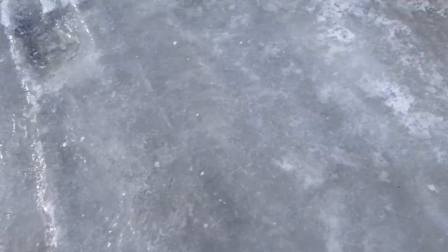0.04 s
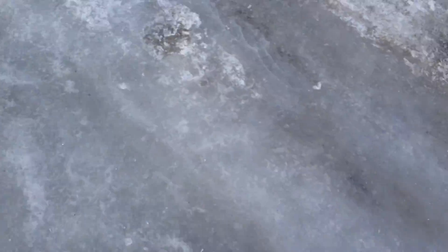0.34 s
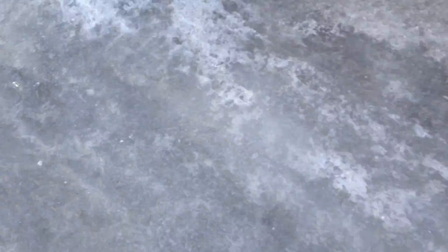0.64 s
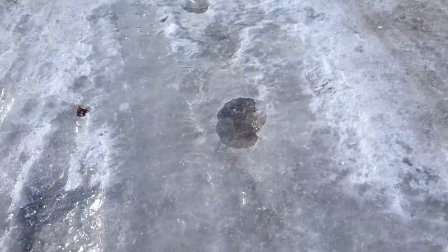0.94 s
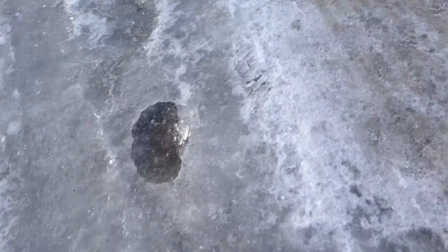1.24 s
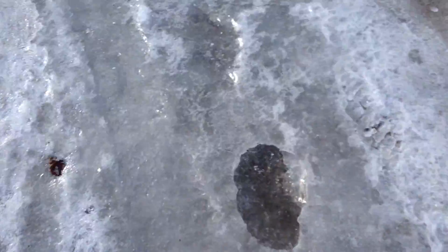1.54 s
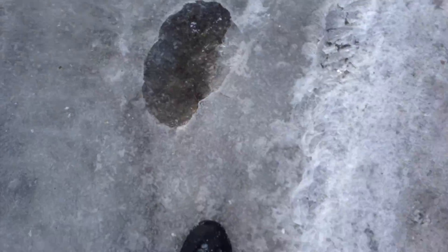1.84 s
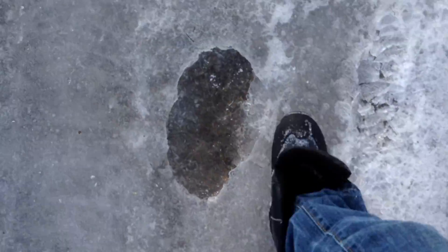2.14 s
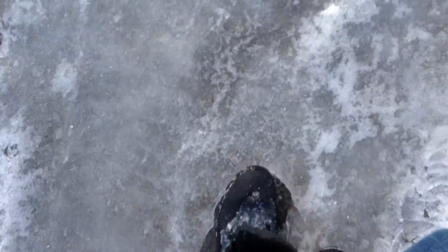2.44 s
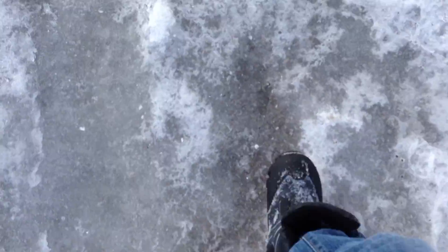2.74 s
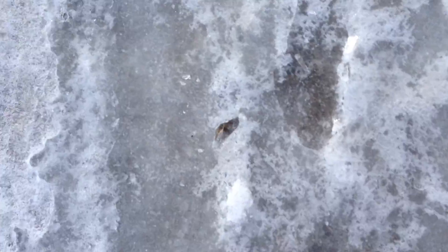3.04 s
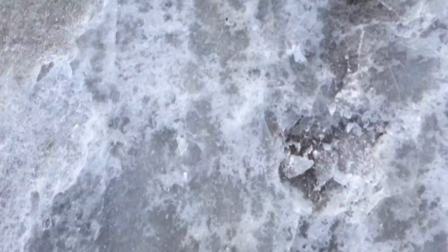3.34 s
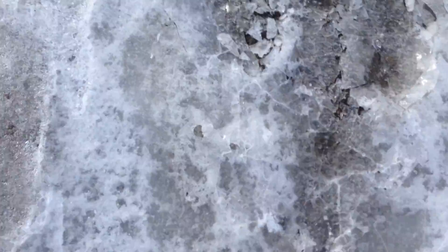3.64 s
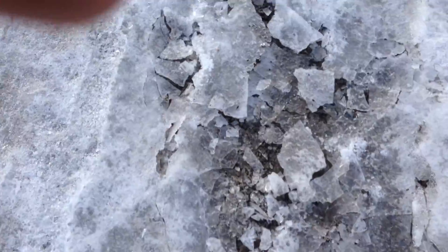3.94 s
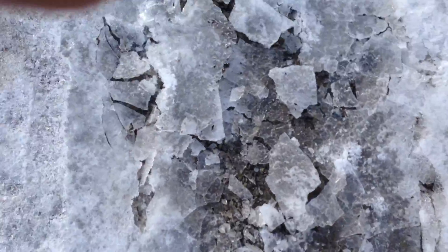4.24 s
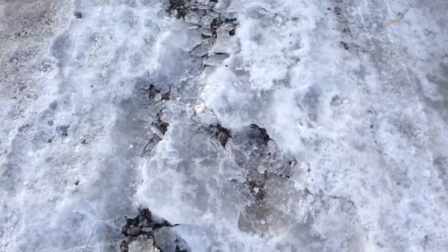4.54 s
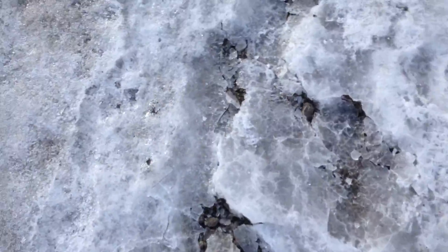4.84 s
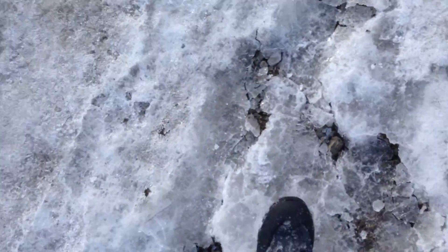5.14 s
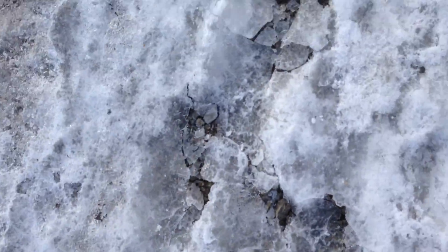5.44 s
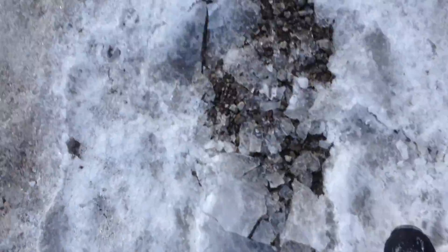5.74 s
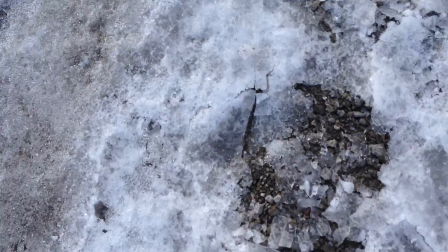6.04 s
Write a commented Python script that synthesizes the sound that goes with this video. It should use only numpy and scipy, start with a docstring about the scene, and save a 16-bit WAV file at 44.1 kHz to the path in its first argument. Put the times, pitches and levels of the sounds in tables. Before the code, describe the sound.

Soft footsteps on solid ice turn into sharp cracks and crunches as thin ice breaks, over light wind rumble and faint distant traffic.

```python
"""Boots walk on frozen ground close to the microphone: soft steps on solid ice, then thin ice gives way.
Plates snap, rock and knock over the hollow below; splinters crunch and grit rustles under the sole.
Two small metal zip pulls jingle with the stride.
Gusts buffet the microphone; far traffic murmurs in the open air."""
import sys
import numpy as np
from scipy import signal
from scipy.fft import rfft, irfft, next_fast_len
from scipy.io import wavfile
from scipy.ndimage import map_coordinates

SR = 44100
rng = np.random.default_rng(int(sys.argv[2]) if len(sys.argv) > 2 else 0)


def log_audio(samples):
    """Write samples as a 16-bit WAV file to the path given in sys.argv[1]."""
    # one column per channel
    frames = np.atleast_2d(samples).T
    # limit to full scale, then quantise
    limited = np.clip(frames, -1, 1)
    pcm = np.round(limited * 32767).astype(np.int16)
    wavfile.write(sys.argv[1], SR, pcm)


N = 277830

# ice plates snap: (time [s], level [dB], pitch [Hz], splinter treble [dB])
SNAPS = [(.174, -46.5, 2850, -45), (0.643, -41.5, 1500, -47.5), (1.176, -43, 1980, -43.5),
         (1.289, -35, 2930, -43), (1.388, -35.5, 1780, -64), (1.564, -53, 1460, -42),
         (1.592, -38.5, 3240, -40), (2.426, -58, 2300, -44.5), (2.59, -42, 2640, -54),
         (2.676, -39.5, 2960, -44), (2.799, -38, 3100, -47), (2.953, -34.5, 1510, -37),
         (2.964, -39, 1840, -44), (2.971, -47, 2010, -38), (3.055, -32, 1930, -49),
         (3.061, -32.5, 1940, -57), (3.219, -26, 2030, -34), (3.284, -24.5, 2600, -55),
         (3.313, -21.5, 1630, -52), (3.318, -24.5, 2000, -48), (3.403, -26.5, 1690, -64),
         (3.657, -40, 1530, -45), (3.669, -35.5, 3400, -38), (3.739, -32.5, 2430, -50),
         (3.757, -24.5, 1290, -35), (3.788, -23.5, 3630, -35), (3.897, -41, 5100, -32),
         (3.958, -51, 3800, -48), (3.979, -58, 4550, -41.5), (4.023, -53, 3580, -47),
         (4.066, -48, 1980, -46), (4.078, -34, 3000, -45), (4.132, -36.5, 2620, -40),
         (4.217, -32, 2700, -35), (4.279, -36.5, 3170, -42), (4.306, -30.5, 2060, -63),
         (4.407, -34, 3300, -37.5), (4.479, -36, 2830, -60), (4.581, -32.5, 2580, -43),
         (4.597, -23.5, 1510, -33), (4.643, -21.5, 3330, -26), (4.647, -15.5, 3020, -32),
         (4.694, -23.5, 2390, -41), (4.718, -21.5, 2470, -66), (4.738, -19.5, 2900, -33.5),
         (4.769, -23, 3430, -28.5), (4.802, -26, 3120, -33), (4.822, -28, 2740, -42),
         (4.918, -23.5, 2390, -31), (4.949, -15.5, 3060, -24), (4.997, -23.5, 2010, -27.5),
         (5.029, -62, 3500, -56), (5.048, -33, 1830, -45), (5.073, -30, 2940, -42), (5.086, -27, 3480, -39),
         (5.113, -36, 3100, -49), (5.13, -20, 2700, -30.5), (5.161, -27, 3050, -31),
         (5.168, -18.5, 2760, -35), (5.21, -21.5, 2170, -32), (5.27, -26.5, 1402, -43),
         (5.328, -27.5, 2570, -42), (5.38, -29, 2540, -37.5), (5.549, -26, 1380, -41.5),
         (5.712, -27.5, 1430, -68), (5.814, -33.5, 3340, -45), (5.831, -39, 2920, -37),
         (5.961, -42, 2720, -39.5), (6.118, -40, 1710, -79)]
# boot knocks on a plate: (time [s], level [dB], pitch [Hz], contacts [count])
KNOCKS = [(0.039, -17.5, 546, 1), (1.763, -34.5, 221, 1), (2.156, -38, 230, 1), (2.457, -29, 477, 1),
          (2.48, -32, 400, 3), (2.798, -35, 588, 1), (2.953, -25.5, 377, 1), (2.97, -29.5, 500, 1),
          (3.055, -32.5, 540, 1), (3.06, -27.5, 433, 1), (3.219, -31, 440, 1), (3.278, -26.5, 377, 2),
          (3.285, -34, 179, 1), (3.303, -22.5, 210, 1), (3.317, -26, 560, 1), (3.657, -27, 620, 1),
          (3.669, -21, 595, 2), (3.687, -30.5, 285, 2), (3.758, -17.5, 635, 1), (3.787, -28, 1330, 1),
          (3.796, -25.5, 1150, 1), (4.169, -33.5, 392, 1), (4.196, -24, 550, 1), (4.219, -23, 490, 1),
          (4.229, -26.5, 607, 2), (5.556, -28.5, 303, 1), (5.713, -24.5, 825, 1), (5.771, -28, 452, 1),
          (5.815, -27.5, 380, 1), (5.903, -28, 297, 1)]
# sole crushes ice: (time [s], length [s], level [dB], coarse [relative dB], fine [relative dB], plate [Hz])
CRUNCHES = [(.655, 0.024, -50.5, -4, -6, 900), (1.259, 0.025, -45.5, -11, -14, 900),
            (1.373, 0.029, -50, -2, -26, 1500), (1.765, 0.065, -49.5, -1, -13.5, 790),
            (2.471, 0.028, -43, 10.5, -9.5, 467), (2.784, 0.041, -45.5, -0.5, -5.5, 587),
            (3.282, 0.051, -28, 0, -25, 513), (3.66, 0.033, -38, 4.5, -9, 583),
            (3.783, 0.034, -26, 3.5, -8, 1190), (4.216, 0.024, -38, 2.5, -2.5, 554),
            (4.648, 0.0073, -25, -12, -10, 1600), (4.688, 0.047, -34, -5, -13, 1290),
            (4.731, 0.069, -28.5, -7, -8.5, 1260), (4.821, .09, -32.5, -18, -9.5, 1310),
            (5.211, .034, -31, -3, -8.5, 1170), (5.246, 0.043, -29, 1, -11.5, 1380),
            (5.288, 0.17, -41, -16, -10, 1300), (5.542, 0.0083, -35, 10.5, -7, 1050),
            (5.702, 0.017, -41.5, 12, -11, 1020), (6.249, 0.023, -35.5, -14, -10, 850)]
# boot rolls over grit: (time [s], length [s], level [dB])
SHUFFLES = [(.4, 0.12, -65), (1.25, 0.45, -57), (2.03, 0.38, -57), (2.45, 0.52, -56), (2.97, 0.53, -58),
            (3.8, 0.046, -46), (3.95, 0.37, -57), (4.21, .2, -46.5), (4.45, 0.36, -55), (4.73, 0.11, -36),
            (5.21, 0.29, -48), (5.55, 0.6, -57.5)]
# spectra of splinters by size, frost grains and a dull push of sole or air: (frequency [Hz], level [dB])
COARSE_SPECTRUM = [(50, -3), (150, -16.5), (400, -3), (600, 1.5), (900, 1.5), (1300, 6), (1800, -2),
                   (3000, -30), (8000, -76)]
MIDDLE_SPECTRUM = [(500, -31), (1000, 1), (1400, 7), (1900, 3.5), (2900, 5), (3900, 1), (4800, -4),
                   (6500, -8.5), (9000, -30), (16000, -45)]
FINE_SPECTRUM = [(2500, -32), (5000, -2), (7000, 8), (8500, 3), (11000, -1.5), (15500, -1)]
GRIT_SPECTRUM = [(800, 2.5), (2000, -3.5), (3200, 1.5), (4500, -4.5), (7000, -6.5), (9000, -9.5),
                 (15500, -13.5)]
THUD_SPECTRUM = [(50, -18), (150, -8), (450, 6), (750, -5.5), (1200, -19), (2200, -39.5), (6000, -56)]
# zip pull jolts: (time [s], level [dB])
LONG_PULL_JOLTS = [(.175, -53), (.335, -60), (.412, -54), (.66, -53), (1.177, -48), (1.275, -48),
                   (1.48, -58), (1.593, -55), (1.625, -51)]
SHORT_PULL_JOLTS = [(.215, -48), (1.5, -54), (1.567, -52), (2.285, -58), (2.895, -59), (3.121, -49),
                    (3.505, -58), (4.21, -49), (5.146, -46), (5.38, -47), (5.975, -52), (6.09, -56)]
# zip pull modes: (frequency [Hz], level [dB], t60 [s])
LONG_PULL_MODES = [(8463, -10, .25), (9991, -13, .22), (10900, -11, .13), (12608, -6, .1), (13571, -3, .18),
                   (15283, -6, .2)]
SHORT_PULL_MODES = [(11150, -2, .11), (14200, -5, .09)]
# gusts on the microphone: (time [s], length [s], level [dB])
GUSTS = [(0, .27, -22.5), (.53, 0.039, -39), (.95, 0.046, -55), (1.5, 0.062, -48), (2.0, 0.23, -65),
         (2.43, 0.092, -37), (3.27, 0.033, -38), (3.88, 0.054, -47.5), (5.02, 0.21, -40), (5.35, 0.13, -38),
         (5.55, 0.018, -35), (5.66, 0.2, -37.5), (5.9, 0.13, -30), (6.16, 0.013, -34.5),
         (6.27, 0.036, -34.5)]
# spectra of wind buffet and far tyres: (frequency [Hz], level [dB])
WIND_SPECTRUM = [(20, -54), (40, -3), (70, 5.5), (130, 3.5), (250, -2), (420, -8), (600, -21), (800, -14),
                 (1500, -72), (4000, -87)]
TYRE_SPECTRUM = [(30, -8), (90, 2), (170, -16), (270, -4), (500, -0.5), (850, 4.5), (1300, 0), (1900, -2.5),
                 (2300, -7), (2800, -18), (4500, -27), (15000, -43.5)]
# far tyre rush and engine drone: (time [s], level [dB])
TYRE_LEVELS = [(0, -43), (.7, -42), (1.5, -41.5), (1.9, -44), (3, -43.5), (4.2, -42.5), (5.2, -44.5),
               (6.3, -47)]
ENGINE_LEVELS = [(0, -69), (.8, -60), (1.2, -55), (2.1, -50), (3.1, -56.5), (3.7, -65.5), (6.3, -48)]

TOP_HZ = 15400


def snaps(lead_s=.003, ref_hz=2020, flex_hz=1030, stray_gap_s=.022, stray_hz=3150):
    """Plates snap and flex under the boot; small strays break at random during the longer crunches."""
    out = np.zeros(N)
    for s, db, hz, treble_db in SNAPS:
        add(out, s - lead_s, snap(db, hz, treble_db, lead_s))
        flex_db = db - 6 - 13 * np.log2(hz / ref_hz)  # larger, lower plates boom more
        add(out, s, knock(flex_db, flex_hz * (hz / ref_hz) ** .27))
    for s, length_s, db, *_ in CRUNCHES:
        for k in range(1, int(length_s / stray_gap_s)):
            stray_db = db - .5 + 2.5 * rng.standard_normal()
            start_s = s + (k + rng.random()) * stray_gap_s
            hz = stray_hz * 2 ** rng.uniform(-.42, .47)
            add(out, start_s, snap(stray_db, hz, stray_db - 9, lead_s))
    return out


def snap(db, hz, treble_db, lead_s, creak_db=-22, first_db=9, crumb_db=-29, crumb_t60_s=.53):
    """Ice creaks, cracks in a volley of fractures and sheds crumbs; the broken piece rings briefly."""
    t = np.arange(SR // 12) / SR - lead_s
    splinter_db = treble_db + 41  # more splintering: longer volley, less pure ring
    t60_s = .016 * amp(.19 * splinter_db)
    decay = amp(-60 * abs(t) / t60_s) + amp(crumb_db - 60 * t / crumb_t60_s)
    volley = fractures(len(t), per_s=6600, spread_db=-.5) * np.where(t < 0, amp(creak_db), decay)
    volley[round(lead_s * SR)] += amp(first_db)
    overtone = resonate(volley, hz * 1.404 * rng.uniform(.685, 1.158), q=12)
    body = amp(-8 + .6 * splinter_db) * unit(colour(volley, MIDDLE_SPECTRUM))
    ring = unit(resonate(volley, hz, q=9)) + amp(-7) * unit(overtone) + body
    ring = signal.sosfilt(signal.butter(2, [600, 8000], "band", fs=SR, output="sos"), ring)
    chips = unit(volley) + unit(resonate(volley, hz=rng.uniform(5600, 13900), q=3.8))
    chips = colour(chips, FINE_SPECTRUM)
    return amp(db) * burst(ring, span_s=.0061) + amp(treble_db) * burst(chips, span_s=.0039)


def knocks(rock_s=.0097, loss_db=5):
    """A boot lands on a plate; a loose one rocks back and knocks again, weaker each time."""
    out = np.zeros(N)
    for s, db, hz, contacts in KNOCKS:
        for k in range(round(contacts)):
            add(out, s + k * rock_s, knock(db - k * loss_db, hz))
    return out


def knock(db, hz, upper_db=-9, thud_db=-7, attack_s=.00065):
    """A plate over its air pocket: a low mode, a weaker upper one and the dull push of the sole."""
    t = np.arange(SR // 10) / SR
    t60_s = .022 * (550 / hz) ** .84
    fade = amp(-60 * t / t60_s)
    phase = 2 * np.pi * hz * t
    upper_ratio = 1.588 * rng.uniform(.792, 1.232)
    modes = np.sin(phase) + amp(upper_db) * np.sin(phase * upper_ratio)
    ring = modes * fade * (1 - np.exp(-t / attack_s))
    thud = colour(rng.standard_normal(len(t)) * fade, THUD_SPECTRUM)
    return amp(db) * burst(unit(ring) + amp(thud_db) * unit(thud), span_s=.0081)


def crunches(release_s=.013, sag_db=4, firm_db=-29):
    """Under the body's weight, ice crumbles in fits into coarse, middle and fine splinters."""
    out, t = np.zeros(N), np.arange(SR // 5) / SR
    for s, length_s, db, coarse_db, fine_db, plate_hz in CRUNCHES:
        attack_s = .00069 * amp(.59 * (firm_db - db))  # gentle steps load the ice more slowly
        pressure = gate(t, length_s, attack_s, release_s) * amp(sag_db * (.5 - t / length_s))
        fits = amp(2.6 * wobble(260, len(t)))
        cracks = unit(fractures(len(t), per_s=2600, spread_db=4))
        shards = unit(splinters(len(t), per_s=3600, spread_db=5, t60_s=.02))
        breaks = fits * (shards + cracks)
        shake = unit(colour(breaks, COARSE_SPECTRUM))
        plate = unit(resonate(shake, plate_hz, q=4))
        coarse = unit(shake + amp(-1) * plate)
        middle = unit(colour(breaks, MIDDLE_SPECTRUM))
        fine = unit(colour(breaks, FINE_SPECTRUM))
        add(out, s, amp(db) * pressure * (amp(coarse_db) * coarse + middle + amp(fine_db) * fine))
    return out


def splinters(n, per_s, spread_db, t60_s, ring_samples=900):
    """Splinters break off at random, each ringing briefly at its own pitch."""
    draws = rng.random((int(per_s * n / SR) + 1, 4))
    start, pitch, force, life = draws.T[:, :, None]
    t = np.arange(ring_samples) / SR
    hz = pitch * TOP_HZ
    level_db = spread_db * np.minimum(-np.log(1 - force), 3)
    rings = amp(level_db - 60 * t / (t60_s * (.5 + life))) * np.sin(2 * np.pi * hz * t)
    index = (start * n).astype(int) + np.arange(ring_samples)
    return np.bincount(index.ravel(), rings.ravel(), n)[:n]


def grit(tick_db=-5, floor_db=-61.5):
    """Clumps of frost grains rustle under each rolling boot, with sharper dry ticks among them."""
    rustle = unit(fractures(N, per_s=6000, spread_db=3))
    ticks = unit(fractures(N, per_s=130, spread_db=4))
    grains = (rustle + amp(tick_db) * ticks) * amp(1.7 * wobble(35))
    weight = amp(floor_db) + swells(SHUFFLES, attack_s=.02, release_s=.055, sag_db=4)
    return weight * unit(colour(grains, GRIT_SPECTRUM))


def zip_pull(jolts, modes, rattle_t60_s=.06, tick_t60_s=.017, tick_db=-13):
    """A metal tab chatters against its slider; each jolt rings its modes at new strengths."""
    out, t = np.zeros(N), np.arange(SR // 3) / SR
    for s, db in jolts:
        ring = np.zeros(len(t))
        for hz, level_db, t60_s in modes:
            strike_db = rng.uniform(-5, 2)
            detuned_hz = hz * rng.uniform(.996, 1.004)
            ring += amp(level_db + strike_db - 60 * t / t60_s) * np.sin(2 * np.pi * detuned_hz * t)
        tick = colour(rng.standard_normal(len(t)) * amp(-60 * t / tick_t60_s), FINE_SPECTRUM)
        contact = ring + amp(tick_db) * burst(tick, span_s=.019)
        bounces = fractures(len(t), per_s=170, spread_db=2) * amp(-60 * t / rattle_t60_s)
        bounces[0] = 1
        bounces /= np.linalg.norm(bounces)
        add(out, s, amp(db) * signal.fftconvolve(bounces, contact)[:len(t)])
    return out


def wind(breeze_db=-54, puffs_per_s=34, puff_hz=214.4, rise_cycles=.55):
    """Eddies roll over the microphone with each gust; some strike it as single low puffs."""
    breeze = amp(breeze_db + 3.5 * wobble(5))
    strength = breeze + swells(GUSTS, attack_s=.004, release_s=.03, sag_db=5.5)
    eddies = unit(fractures(N, per_s=600, spread_db=4)) + .48 * rng.standard_normal(N)
    flutter_db = 1.8 * wobble(25)
    out = strength * amp(flutter_db) * unit(colour(eddies, WIND_SPECTRUM))
    t = np.arange(SR // 16) / SR
    for k in range(int(puffs_per_s * N / SR)):
        s = (k + rng.random()) / puffs_per_s
        relative_db = 1 + 2 * rng.standard_normal()
        hz = puff_hz * 2 ** (.34 * rng.standard_normal())
        age = hz * t / rise_cycles
        swing = np.sin(2 * np.pi * (hz * t + rng.random()))
        turbulence = .5 * unit(colour(rng.standard_normal(len(t)), THUD_SPECTRUM))
        puff = burst((swing + turbulence) * age ** 2 * np.exp(-2 * age), span_s=.013)
        add(out, s, strength[int(s * SR)] * amp(relative_db) * puff)
    return out


def traffic(engine_hz=170, engine_q=2.5):
    """Far tyres make a slightly wavering rush over the low drone of an engine."""
    tyre_db = curve(TYRE_LEVELS) + .41 * wobble(20)
    tyres = amp(tyre_db) * unit(colour(rng.standard_normal(N), TYRE_SPECTRUM))
    engine = resonate(rng.standard_normal(N), engine_hz, engine_q)
    engine = resonate(engine, engine_hz, engine_q)
    return tyres + amp(curve(ENGINE_LEVELS)) * unit(engine)


def fractures(n, per_s, spread_db):
    """Impulses of random time, sign and size."""
    chance, sign, size = rng.random(n), rng.choice([-1, 1], n), rng.exponential(1, n)
    return (chance < per_s / SR) * sign * amp(spread_db * np.minimum(size, 4))


def gate(t, length_s, attack_s, release_s):
    """Exponential attack, hold, exponential release."""
    return (1 - np.exp(-t / attack_s)) * np.exp(-np.maximum(t - length_s, 0) / release_s)


def swells(rows, attack_s, release_s, sag_db):
    """Summed gain of swells that rise, sag while held and die away."""
    gain = np.zeros(N)
    for s, length_s, db in rows:
        t = np.maximum(np.arange(N) / SR - s, 0)
        gain += amp(db - sag_db * np.minimum(t / length_s, 1)) * gate(t, length_s, attack_s, release_s)
    return gain


def colour(x, spectrum, size=4096):
    """x through a minimum-phase filter with the given spectrum."""
    hz, db = np.transpose(spectrum)
    grid_hz = np.fft.rfftfreq(size, 1 / SR)
    gain = amp(np.interp(np.log(grid_hz + 1), np.log(hz), db))
    cepstrum = irfft(np.log(gain))
    cepstrum[1:size // 2] *= 2
    cepstrum[size // 2 + 1:] = 0
    return signal.fftconvolve(x, irfft(np.exp(rfft(cepstrum))))[:len(x)]


def resonate(x, hz, q):
    """x through one resonance, capped at SR / 4."""
    return signal.lfilter(*signal.iirpeak(min(hz, SR / 4), max(q, 1), SR), x)


def wobble(knots_per_s, n=N):
    """Smooth random curve."""
    knots = rng.standard_normal(int(n * knots_per_s / SR) + 4)
    return map_coordinates(knots, [np.arange(n) * knots_per_s / SR])


def curve(rows):
    """(time [s], value) rows to one value per sample."""
    return np.interp(np.arange(N) / SR, *np.transpose(rows))


def amp(db):
    """Decibels to gain."""
    return 10 ** (np.asarray(db) / 20)


def unit(x):
    """x at rms 1."""
    return x / np.sqrt(np.mean(x ** 2) + 1e-20)


def burst(x, span_s):
    """x with the energy of rms 1 held for span_s."""
    return x * np.sqrt(span_s * SR / (np.sum(x ** 2) + 1e-20))


def add(track, start_s, sound):
    """Mix sound into track at start_s."""
    slot = track[max(round(start_s * SR), 0):][:len(sound)]
    slot += sound[:len(slot)]


def scene():
    """Ice, zip pulls and outdoor air; mono, no reverberation."""
    air = wind() + traffic()
    zips = zip_pull(LONG_PULL_JOLTS, LONG_PULL_MODES) + zip_pull(SHORT_PULL_JOLTS, SHORT_PULL_MODES)
    ice = grit() + crunches() + knocks() + snaps()
    return (ice + zips + air)[None]


def record(dry, low_cut_hz=42):
    """High-pass against rumble; hard band limit at TOP_HZ."""
    thinned = signal.sosfilt(signal.butter(3, low_cut_hz, "high", fs=SR, output="sos"), dry)
    size = next_fast_len(N + SR // 2)
    passband = np.fft.rfftfreq(size, 1 / SR) < TOP_HZ
    return irfft(rfft(thinned, size) * passband, size)[..., :N]


dry = scene()
out = record(dry)
log_audio(out)
```